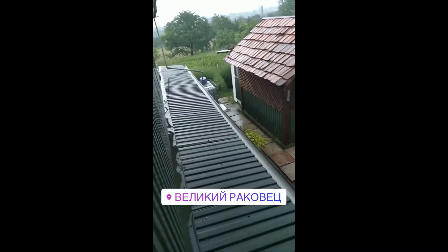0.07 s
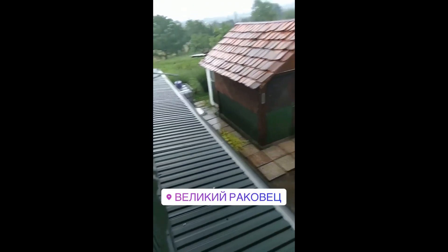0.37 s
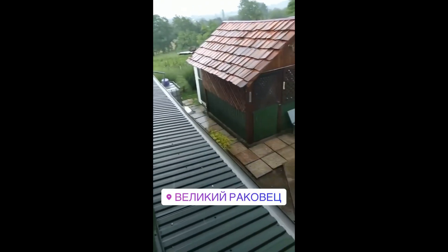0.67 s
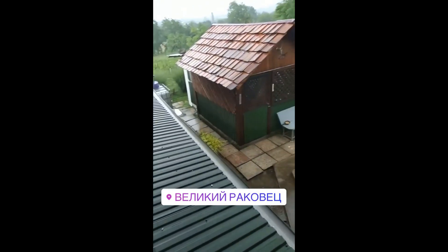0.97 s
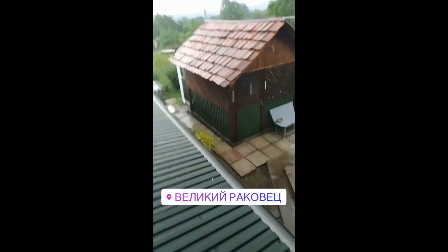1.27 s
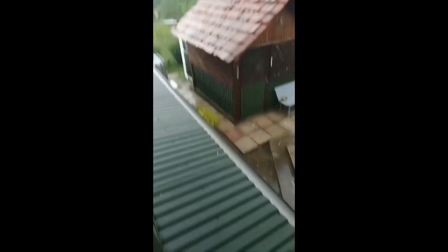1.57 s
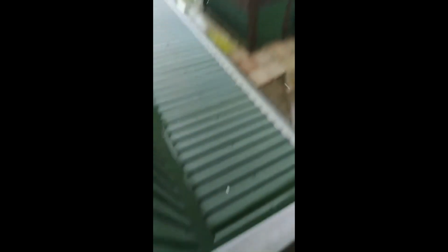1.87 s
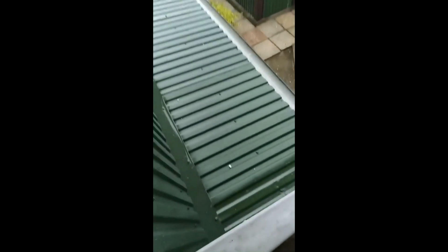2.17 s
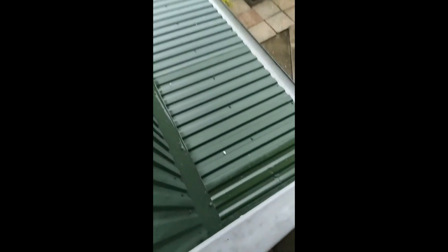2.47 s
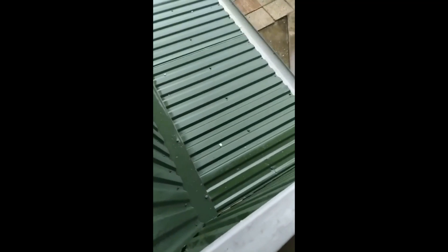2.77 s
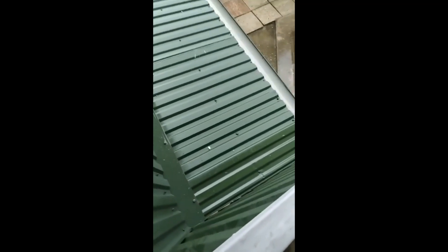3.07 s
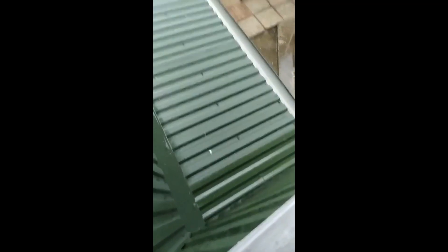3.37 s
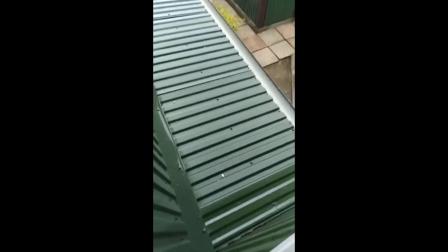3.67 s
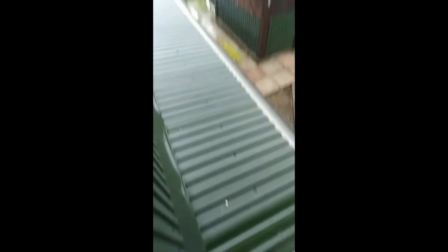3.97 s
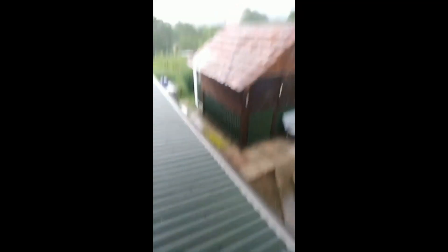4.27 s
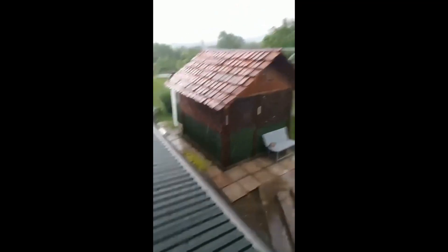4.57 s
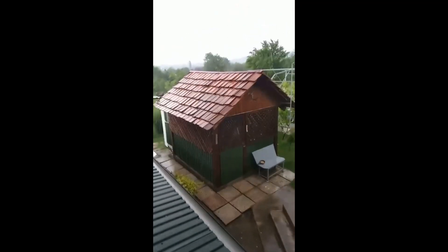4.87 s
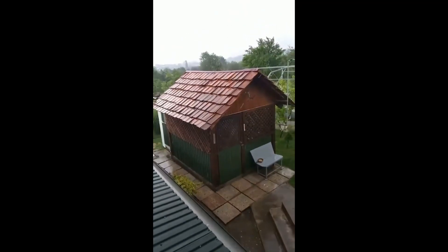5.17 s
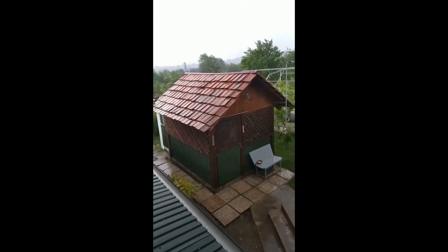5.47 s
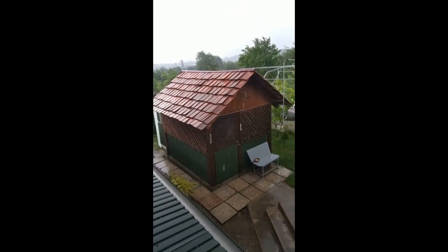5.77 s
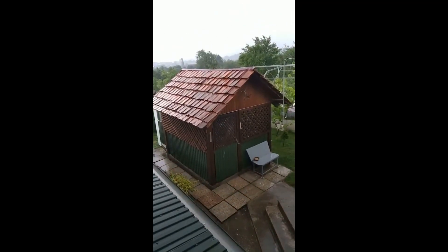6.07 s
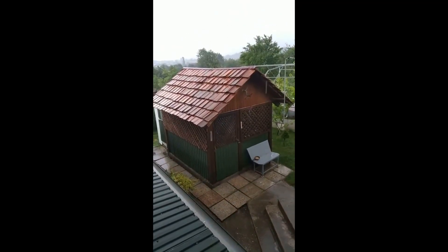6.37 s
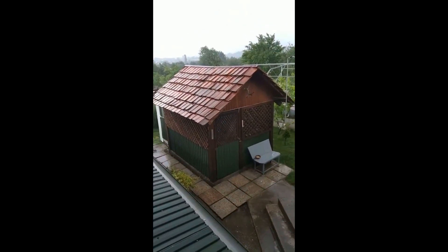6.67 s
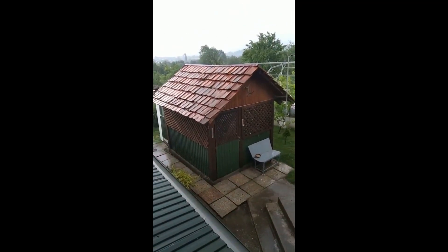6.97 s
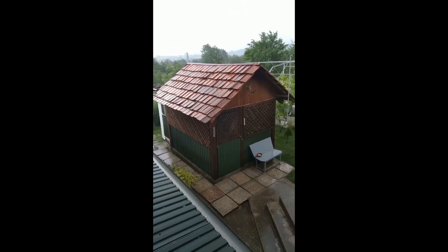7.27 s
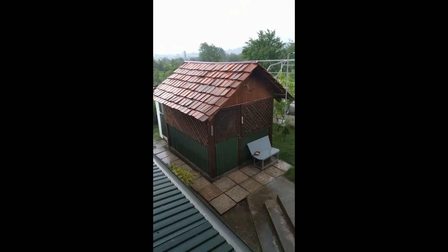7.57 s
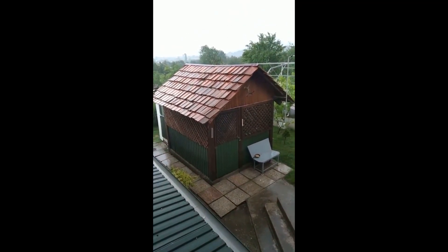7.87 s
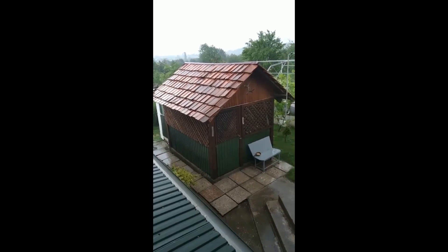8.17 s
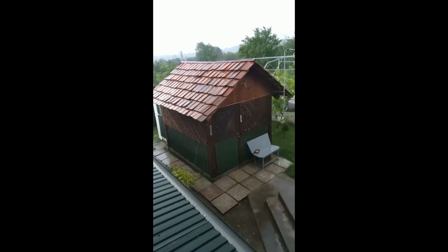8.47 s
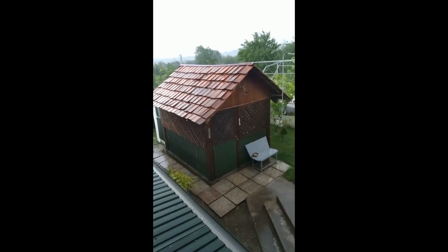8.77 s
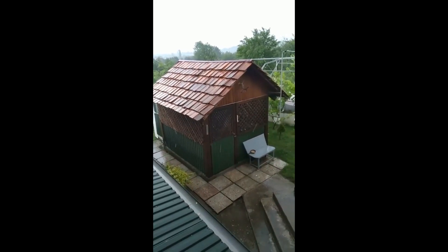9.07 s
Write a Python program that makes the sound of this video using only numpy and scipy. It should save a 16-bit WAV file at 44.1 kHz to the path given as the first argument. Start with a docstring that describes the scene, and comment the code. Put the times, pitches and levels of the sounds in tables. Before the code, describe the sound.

Dense hail beats on a ribbed steel roof outdoors for the whole nine seconds or so. Countless distant stones blend into steady drumming with a bright, icy hiss. Over this, close stones land irregularly several times a second, some shattering with a short rattle, others bouncing with a crack and a ping, while bigger ones make the panels clank.

A strong rattling clank with a low thump comes at about 0.9 seconds. The sound cuts out from roughly 1.4 to 1.6 seconds, then returns at full level. More heavy hits land near 3.7, 4.3 and 4.6 seconds, followed by a sharp double ping and a thump just after 5 seconds. Further clanking blows stand out around 5.9, 6.3 and 8.8 seconds. Everything comes through a phone microphone close above the roof, on the right channel only, with the level dipping briefly after bright impacts.

```python
"""Hail on a steel roof

Hail beats on a ribbed steel roof just below a window, and on the roofs and yard around it.
Countless far stones merge into drumming and hiss. Near ones shatter with a rattle or bounce with
a ping, and heavy blows make the panels clank and thump. It is all heard through a phone with one
live channel, which turns itself down after bright blows and cuts out once for a moment."""
import sys
import numpy as np
from scipy import signal
from scipy.fft import rfft, irfft
from scipy.io import wavfile
from scipy.ndimage import uniform_filter1d, map_coordinates

SR = 44100
rng = np.random.default_rng(int(sys.argv[2]) if len(sys.argv) > 2 else 0)


def waveform_to_disk(signal):
    """Save audio, clipped to [-1, 1], as 16-bit WAV at the path in sys.argv[1]."""
    frames = np.transpose(np.atleast_2d(signal))
    scaled = np.clip(frames, -1, 1) * 32767
    samples = np.round(scaled).astype(np.int16)
    wavfile.write(sys.argv[1], SR, samples)


N = 411012
TIME = np.arange(N) / SR
AGE = np.arange(2 ** 14) / SR  # seconds since a blow
HZ = np.fft.rfftfreq(len(AGE), 1 / SR)

# How hard it hails. Each row: time in seconds, drumming level in dB, hiss level in dB.
SHOWER_LEVELS = [(0, -23, -21), (.3, -21.5, -25), (.85, -24.5, -26.5), (1.1, -22.5, -23),
                 (1.35, -25.5, -24.5), (1.82, -23.5, -24), (2.05, -21.5, -24), (3.1, -22.5, -25),
                 (3.52, -21.5, -23.5), (4.15, -22.5, -26.5), (4.6, -21.5, -22), (4.88, -22.5, -25),
                 (5.5, -21, -24), (6.15, -21.5, -25), (6.9, -22.5, -23.5), (7.35, -22, -23),
                 (8.4, -21, -24), (9.32, -22.5, -20.5)]
# Stones that shatter. Each row: start in seconds, rattle level in dB, knock level in dB,
# seconds before fading, ringing pitch in Hz.
SOFT_STONES = [(.121, -17, -35, 0.018, 5790), (0.233, -33, -19, .035, 3560), (0.366, -15, -39, 0.021, 6760),
               (0.462, -16.5, -21, 0.065, 4670), (0.69, -11.5, -26, 0.019, 5400),
               (0.899, -15, -15, 0.053, 5500), (0.935, -5, -6, 0.033, 5070), (1.129, -19, -36, .02, 5640),
               (1.602, -6.5, -15.5, 0.047, 5250), (1.646, -15, -32, .056, 5500),
               (1.802, -10, -38, .008, 6850), (2.102, -20, -38, .025, 5170), (2.183, -11, -35, 0.049, 5900),
               (2.427, -19.5, -16, 0.036, 6250), (2.594, -13.5, -17.5, 0.061, 5400),
               (2.873, -12.5, -36, 0.055, 6040), (2.937, -11, -18, 0.046, 5970),
               (3.068, -16, -31, 0.022, 7450), (3.241, -26.5, -23.5, .07, 4820),
               (3.313, -15, -18, 0.0076, 6260), (3.37, -16, -15.5, 0.014, 5540),
               (3.53, -23, -19, .028, 4300), (3.655, -6.5, -6.5, 0.048, 6300),
               (3.692, -12.5, -12, .041, 6000), (3.863, -13, -40, 0.032, 4870),
               (3.987, -13, -16, .03, 4500), (4.261, -4, -9, 0.067, 5600), (4.31, -15.5, -21, 0.06, 5430),
               (4.521, -13, -20, 0.015, 5060), (4.603, -6, -16, 0.034, 5400),
               (4.744, -11.5, -25, 0.029, 4670), (4.955, -11, -17, 0.037, 5370),
               (5.197, -9.5, -16.5, 0.049, 5600), (5.697, -14, -25, .029, 5000),
               (5.764, -16, -17.5, 0.02, 6150), (5.885, -6.5, -14.5, 0.039, 5770),
               (6.091, -9.5, -20.5, 0.0074, 7300), (6.287, -8.5, -12.5, 0.034, 5270),
               (6.341, -9, -20, 0.033, 5300), (6.409, -13.5, -18.5, 0.036, 6130),
               (6.657, -12, -21, 0.026, 5840), (6.742, -13.5, -33, 0.028, 4400),
               (6.799, -11.5, -26, 0.031, 4570), (6.91, -11, -20, .018, 5000),
               (7.414, -16, -21, 0.013, 5500), (8.023, -13, -32, 0.015, 4400),
               (8.099, -22.5, -21.5, 0.041, 5100), (8.224, -20, -26, 0.083, 4800),
               (8.366, -24, -19.5, .04, 5870), (8.407, -16.5, -19, 0.021, 5700),
               (8.6, -9, -23, 0.046, 4600), (8.742, -6.5, -14.5, 0.027, 5000), (8.871, -13, -26, .06, 5400),
               (8.965, -9, -15, 0.03, 4630)]
# Stones that bounce. Each row: start in seconds, level in dB, ping pitch in Hz.
HARD_STONES = [(.175, -19, 4100), (.237, -15.5, 2870), (.421, -15.5, 4720), (.793, -22, 5030),
               (1.313, -13, 6100), (2.263, -9.5, 4640), (2.426, -18, 1290), (3.341, -12, 6300),
               (3.949, -18.5, 1400), (4.24, -6.5, 4650), (5.049, -3.5, 5550), (5.07, -1.5, 5730),
               (5.643, -14, 7150), (6.228, -14.5, 5370), (6.285, -11, 1610), (6.617, -17, 5270),
               (6.736, -8, 4360), (7.106, -12, 880), (7.159, -16, 4080), (7.37, -20.5, 960),
               (7.597, -17, 6000), (7.684, -11.5, 2850), (7.828, -12, 4500), (7.969, -18, 1650),
               (8.27, -13, 4310), (8.651, -8.5, 4600), (8.864, -8, 5130), (9.032, -16, 6650)]
# Blows that set a panel ringing. Each row: start in seconds, level in dB, pitch in Hz.
PANEL_BLOWS = [(.695, -16, 1415), (.934, -7.5, 1430), (1.641, -13.5, 1450), (2.175, -15.5, 1420),
               (2.873, -24, 920), (3.399, -20, 2220), (3.668, -11.5, 1460), (3.772, -24.5, 870),
               (3.92, -26, 820), (4.268, -8, 3200), (4.272, -16, 1760), (4.638, -24, 810),
               (4.981, -16, 1900), (5.395, -22, 1400), (5.89, -12, 2670), (5.906, -17, 1400),
               (6.289, -11.5, 2920), (6.295, -10.5, 1330), (6.46, -28.5, 894), (6.681, -21, 2010),
               (7.602, -19.5, 1520), (7.974, -18.5, 1430), (8.396, -23.5, 890), (8.55, -28, 820),
               (8.753, -11.5, 1530), (8.973, -11, 1365)]
# Stones that bend the roof. Each row: start in seconds, level in dB, seconds before fading.
HEAVY_STONES = [(0.932, -16.5, 0.019), (3.69, -23, 0.024), (4.263, -20.5, 0.048), (4.598, -25.5, 0.0094),
                (5.053, -12.5, 0.014), (6.294, -26, 0.022), (8.755, -17.5, 0.0054)]
# The tone of each sound, from bass to treble. Each row: frequency in Hz, relative level in dB.
DRUM_TONE = [(25, -19), (65, -27.5), (100, -22), (135, -10), (300, -7.5), (650, -3), (870, 3.5),
             (1150, 1.5), (1450, 0.5), (2000, -0.5), (2900, -2), (3700, -11.5), (6000, -26), (13000, -56.5)]
HISS_TONE = [(1500, -24), (3500, 1), (4200, 2), (5200, 3), (6200, 1), (7100, -4), (8000, -11), (8500, -19),
             (10000, -24.5), (12500, -29), (14000, -52.5)]
RATTLE_TONE = [(1000, -55), (2800, -7.5), (3700, -4), (4300, 2.5), (5400, 0.5), (7000, 0), (7900, -6),
               (8500, -17.5), (10000, -20.5), (12500, -24), (14000, -46.5)]
KNOCK_TONE = [(25, -46), (70, -25), (130, -14.5), (350, -7.5), (600, -6.5), (900, -1), (1400, 1),
              (2000, -0.5), (2800, 0.5), (3700, -2.5), (5000, -11.5), (9000, -38), (14000, -51.5)]
THUMP_TONE = [(25, -27), (60, -11), (100, -9), (140, -2.5), (260, -4.5), (400, -4.5), (700, -11),
              (2000, -40)]


def amp(db):
    """Turn decibels into a gain to multiply by."""
    return 10 ** (np.asarray(db) / 20)


def unit(x):
    """Scale each row to an average power of 1."""
    return x / np.sqrt(np.mean(x ** 2, axis=-1, keepdims=True) + 1e-20)


def tone_gain(tone):
    """Turn a tone table into a gain for every frequency."""
    hz, db = np.transpose(tone)
    return amp(np.interp(np.log(HZ + 1), np.log(hz), db))


def wobble(count, knots):
    """Smooth random curves, one a row, read at the positions in knots."""
    values = rng.standard_normal((count, int(knots[-1]) + 4))
    return np.array([map_coordinates(row, [knots], mode="nearest") for row in values])


def resonance(hz, width_hz):
    """A gain that favours the frequencies near one pitch."""
    return 1 / (1 + ((HZ ** 2 - hz ** 2) / (HZ * width_hz + 1)) ** 2)


def sheet(count, gain, ripple_db, ripple_hz):
    """Thin steel rings at many pitches at once; each struck spot favours different ones."""
    ripple = amp(ripple_db * wobble(count, HZ / ripple_hz))
    noise = rng.standard_normal((count, len(AGE)))
    return unit(irfft(rfft(noise) * gain * ripple))


def steady(ring):
    """Even out a wavering ring, since one blow gives it a fixed amount of energy."""
    power = np.abs(uniform_filter1d(ring ** 2, SR // 60, axis=1))
    return ring / np.sqrt(power + 1e-6)


def fade(hold, t60, attack=0.00067):
    """Rise fast, hold while waves run between the ribs, then fall 60 dB every t60 seconds."""
    return (1 - np.exp(-AGE / attack)) * amp(-60 * np.maximum(AGE - hold, 0) / t60)


def place(starts, sounds):
    """Add each sound in at its start time."""
    index = np.maximum(starts * SR, 0).astype(int) + np.arange(len(AGE))
    return np.bincount(index.ravel(), sounds.ravel(), N)[:N]


def patter(tone, rate, size_db, t60, ripple_db, ripple_hz, count):
    """Stones of random size fall at random, about rate a second, on count spots of roof."""
    spots = sheet(count, tone_gain(tone), ripple_db, ripple_hz) * fade(0, t60)
    stones_per_spot = max(int(rate * N / SR / count), 1)
    span = N + len(AGE) - 1  # starts early, so the hail is already falling
    total = np.zeros(N)
    for spot in spots:
        when, size_draw = rng.random((2 ** 12, 2))[:stones_per_spot].T
        size = amp(size_db * np.minimum(-np.log(1 - size_draw), np.pi))  # many small, few big
        blows = np.bincount((when * span).astype(int), size, span)
        total += signal.oaconvolve(blows - blows.mean(), spot, mode="valid")
    return unit(total)


def far_hail():
    """The whole roof drums, with the hiss of small ice and the ticks of closer stones on top."""
    times, drum_db, hiss_db = np.transpose(SHOWER_LEVELS)
    drum = patter(DRUM_TONE, rate=620, size_db=4.5, t60=0.17, ripple_db=4.5, ripple_hz=280.1, count=40)
    hiss = patter(HISS_TONE, rate=750, size_db=1, t60=0.13, ripple_db=6, ripple_hz=401.1, count=36)
    ticks = patter(RATTLE_TONE, rate=48, size_db=0.5, t60=0.05, ripple_db=4.5, ripple_hz=690, count=14)
    small_ice = hiss + amp(-17.5) * ticks
    return drum * amp(np.interp(TIME, times, drum_db)) + small_ice * amp(np.interp(TIME, times, hiss_db))


def struck_sheet(rattle_db, knock_db, hold, ring_hz):
    """A stone rattles the steel and knocks on the span below; long contacts swell more slowly."""
    swell = 0.0015 + 0.099 * np.abs(hold)
    chatter = unit(amp(0.41 * wobble(len(hold), AGE * 600)))  # bits of ice skitter on the sheet
    ring_db = 12 - 220 * hold  # a shorter tap has a clearer pitch
    bright = tone_gain(RATTLE_TONE) * (1 + amp(ring_db) * resonance(ring_hz, width_hz=1300))
    rattle = sheet(len(hold), bright, ripple_db=3, ripple_hz=301.1)
    rattle *= fade(hold, t60=0.18, attack=swell)
    knock = sheet(len(hold), tone_gain(KNOCK_TONE), ripple_db=3.5, ripple_hz=301.1)
    knock *= fade(hold, t60=0.12, attack=swell / 2)
    return chatter * (amp(rattle_db) * rattle + amp(knock_db) * knock)


def soft_stones():
    """A soft stone breaks up without a crack, and its pieces keep the sheet rattling."""
    starts, rattle_db, knock_db, hold, ring_hz = np.transpose(SOFT_STONES)[:, :, None]
    return place(starts, struck_sheet(rattle_db, knock_db, hold, ring_hz))


def hard_stones():
    """A hard stone bounces off with a crack and a ping, and the sheet rattles briefly."""
    starts, db, ping_hz = np.transpose(HARD_STONES)[:, :, None]
    ping = sheet(len(starts), resonance(ping_hz, width_hz=0.16 * ping_hz), ripple_db=2, ripple_hz=900)
    crack = sheet(len(starts), tone_gain(RATTLE_TONE), ripple_db=3, ripple_hz=900)
    contact = (steady(ping) + amp(-7.5) * crack) * fade(hold=0.0034, t60=0.04, attack=0.00043)
    knock_db = db - 9.5 + 2 * np.log2(5000 / ping_hz)  # bigger stones ping lower and knock harder
    rattle = struck_sheet(db - 6, knock_db, hold=np.full_like(db, 0.017), ring_hz=ping_hz)
    return place(starts, amp(db) * contact + rattle)


def panel_clanks():
    """A struck panel rings around its own note: the lower the note, the longer and purer."""
    starts, db, note_hz = np.transpose(PANEL_BLOWS)[:, :, None]
    hold = 0.032 * (1384 / note_hz) ** 1.83  # a middling panel, at 1384 Hz, holds for 0.032 seconds
    near_note = resonance(note_hz, width_hz=10.5 / (hold + 0.0096))
    ring = sheet(len(starts), near_note, ripple_db=3, ripple_hz=90)
    return place(starts, amp(db) * steady(ring) * fade(hold, t60=0.16))


def roof_thumps():
    """A span of roof gives under a heavy stone and swings a few times."""
    starts, db, hold = np.transpose(HEAVY_STONES)[:, :, None]
    swing = sheet(len(starts), tone_gain(THUMP_TONE), ripple_db=3.5, ripple_hz=101)
    return place(starts, amp(db) * steady(swing) * fade(hold, t60=0.079, attack=0.0022))


def gain_control(x, threshold_db, share, recover_db_per_s, above_hz):
    """The phone turns down just after a bright blow, then steadily turns back up."""
    treble = signal.sosfilt(signal.butter(2, above_hz, "highpass", fs=SR, output="sos"), x)
    window = np.ones(SR // 200) / (SR // 200)
    power = signal.lfilter(window, 1, np.sum(treble ** 2, axis=0))
    excess_db = np.maximum(10 * np.log10(power + 1e-12) - threshold_db, 0)
    recovery_db = recover_db_per_s * TIME
    dip_db = np.maximum.accumulate(share * excess_db + recovery_db) - recovery_db
    return x * amp(-uniform_filter1d(dip_db, SR // 500))


def cut_out(start_s, end_s):
    """The sound drops suddenly, dies to silence and comes back at full level."""
    dying = amp(-11.5 - 1460 * np.maximum(TIME - start_s, 0))
    return np.where((TIME > start_s) & (TIME < end_s), dying, 1)


def scene():
    """Near and far hail together, on the right channel only."""
    hail = far_hail() + hard_stones() + soft_stones() + panel_clanks()
    bass_cut = signal.butter(3, 85, "highpass", fs=SR, output="sos")  # the hail carries no deep bass
    right = signal.sosfilt(bass_cut, hail) + roof_thumps()
    return np.array([np.zeros(N), right])


def record(dry):
    """The phone dips after bright blows, cuts out once, rounds off peaks and drops the top treble."""
    x = gain_control(dry, threshold_db=-27.5, share=0.46, recover_db_per_s=57.5, above_hz=7000)
    x = x * cut_out(start_s=1.384, end_s=1.603)
    x = x / (1 + np.abs(x / 0.8) ** 10) ** 0.1  # squeeze peaks to below 0.8
    treble_cut = signal.ellip(12, 0.1, 100, 13500, fs=SR, output="sos")  # above 13500 Hz
    return signal.sosfilt(treble_cut, x)


dry = scene()
out = record(dry)
waveform_to_disk(out)
```